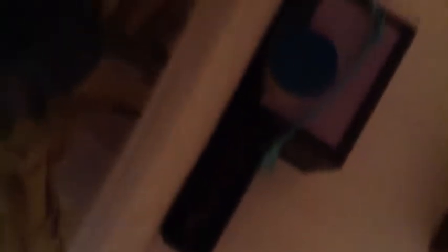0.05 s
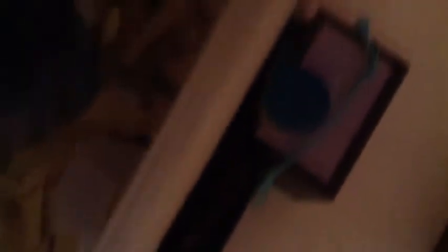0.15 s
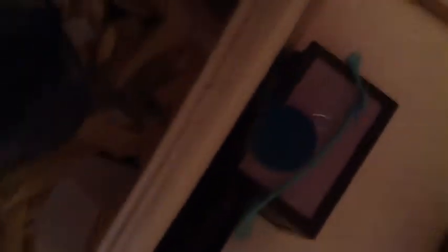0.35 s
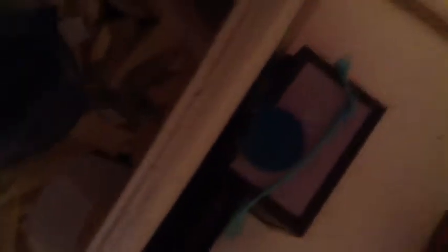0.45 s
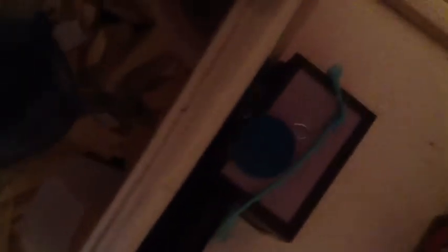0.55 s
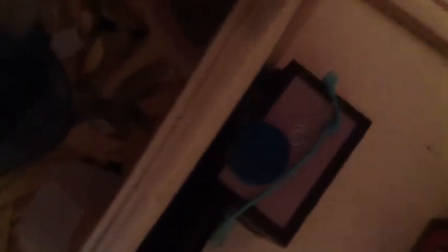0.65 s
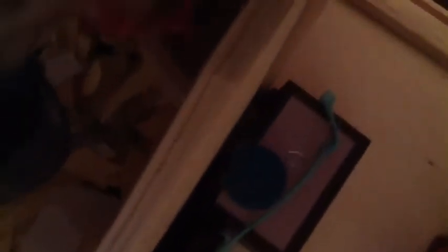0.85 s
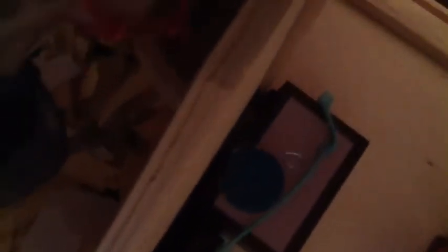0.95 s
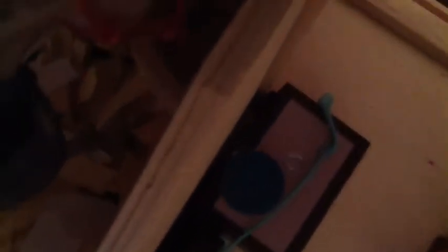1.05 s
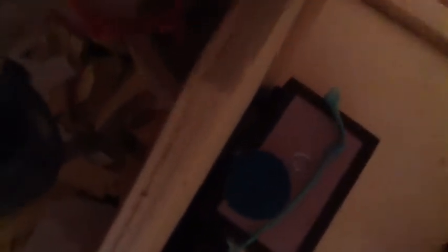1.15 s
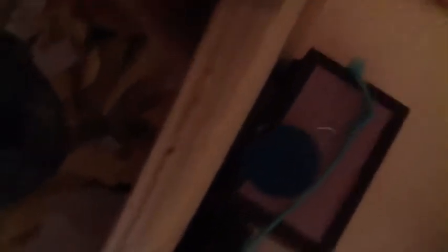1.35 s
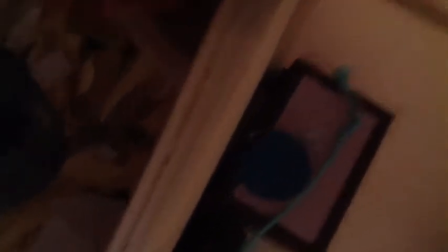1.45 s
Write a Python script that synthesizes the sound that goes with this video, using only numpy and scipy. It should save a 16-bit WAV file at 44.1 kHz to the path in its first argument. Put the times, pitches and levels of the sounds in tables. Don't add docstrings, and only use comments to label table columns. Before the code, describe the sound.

Wooden box knocked once sharply, then scraped and rubbed with light taps, over soft hiss

```python
import sys
import numpy as np
from scipy import signal
from scipy.fft import rfft, irfft
from scipy.io import wavfile
from scipy.ndimage import uniform_filter1d

SR = 44100
rng = np.random.default_rng(int(sys.argv[2]) if len(sys.argv) > 2 else 0)


def gain_from_db(level_db):
    decades = np.asarray(level_db, float) / 20
    return 10 ** decades


def unload_wav(signal):
    wavfile.write(
        sys.argv[1],
        SR,
        np.round(np.clip(np.atleast_2d(signal).T, -1, 1) * 32767).astype(np.int16),
    )


N = 66150
clock = np.arange(N) / SR

# frequency in Hz, spectral level in dB.
HISS_SPECTRUM = [(30, -19), (80, -22), (170, -1.5), (300, -2.5), (600, -8), (1500, -10.5), (5000, -10.5),
                 (15300, -13)]
# frequency in Hz, level when knocked in dB, t60 in seconds,
# level when rubbed in dB.
BOX_MODES = [(142.1, -14, 0.21, -21.5), (176, -16, 0.18, -31), (231, -24, 0.18, -31.5), (292, -4, .07, -3),
             (338.1, -14, 0.23, -14.5), (409, -13, .12, -9.5), (461.2, -19.5, .14, -5.5),
             (282.7, -8.5, .2, -10), (707.2, -7.5, .14, -2), (748.4, -14, .13, -3.5), (803, -18, 0.14, 1),
             (862, -8.5, 0.061, 7.5), (896, -21.5, .09, -13), (1073, -18, 0.088, -6)]
PANEL_MODES = [(1296, -20.5, 0.067, -4.5), (1480, -27.5, 0.023, 1), (1604, -13.5, 0.024, -2.5),
               (1910, -15.5, 0.021, -0.5), (2122, -28, 0.025, -7), (2330, -32.5, 0.026, -8.5),
               (2640, -27, .012, -13), (3060, -25.5, 0.008, -5), (3480, -30.5, .01, -14.5),
               (4094, -46.5, 0.0086, -6.5), (5120, -47.5, 0.0094, -7.5)]
# start in seconds, force in dB, half contact time in ms, crack in dB.
KNOCKS = [
    (0.2178, -25.5, 0.18, -16.5),
    (0.2195, -5, 0.53, -35.5),
    (0.2229, -29, 0.25, -15.5),
    (.25, -31.5, 0.17, -30.5),
    (0.36, -36.5, 0.86, -37),
    (0.961, -49, 0.61, -17.5),
    (1.02, -54, 0.43, -17),
    (1.121, -55, 0.51, -17),
    (1.2135, -44, 0.31, -34),
]
# frequency in Hz, level in dB, t60 in seconds.
LID_MODES = [(135, -17.5, 0.093), (175, 2, 0.02), (250, -12.5, .07), (377, -25.5, 0.1), (550, -11.5, 0.028),
             (567, -3, 0.027), (754, 0.5, 0.032), (1050, -4.5, 0.012), (1340, -15.5, 0.069),
             (2030, -26.5, .014)]
# start in seconds, force in dB, half contact time in ms.
LID_THUDS = [
    (0.3613, -39, 0.84),
    (0.8528, -26, 0.42),
    (.8559, -26, 0.5),
    (0.858, -27, 0.83),
    (.866, -34, 0.52),
    (0.877, -33.5, 0.51),
    (0.88, -44.5, 1.4),
    (0.904, -45, 2.2),
    (.922, -53, 2.4),
]
# time in seconds, pressure in dB, roughness in dB, weight in dB.
STROKES = [
    [(.359, -52, 4.5, 2), (.39, -51.5, -1.5, 9.5), (.44, -51, -0.5, 7), (.47, -49.5, -2.5, -1),
     (.495, -56, -1, 16.5), (.53, -90, 2, 9)],
    [(.535, -59.5, -8, 2), (.565, -51.5, -0.5, 2.5), (.62, -48.5, 3.5, -8), (.67, -51, 4, 2),
     (.721, -57, 8.5, 12), (.745, -80, 18, -18)],
    [(.756, -58, -5, 6), (.79, -60.5, 17.5, -22), (.84, -57, 15, 1), (.87, -64.5, 15, -5),
     (.91, -67, 11.5, -4), (.955, -69.5, 18, 6)],
    [(.957, -52, -2, 0), (.973, -56, 12.5, 2), (1.0, -72, 2, 16), (1.014, -71, 26, 3)],
    [(1.017, -58.5, 11, 11), (1.053, -50, 3, 3), (1.08, -59, 15, 14), (1.121, -49.5, 7, -5),
     (1.17, -63.5, 11.5, 13), (1.2, -71.5, 17, -4), (1.222, -55, 11.5, 10), (1.245, -73, 9, 7)],
]
# start in seconds, force in dB, half contact time in ms.
PUSHES = [
    (.792, -36, 1),
    (0.831, -58, 1),
    (1.104, -41, 0.89),
    (1.117, -41, 1),
    (1.135, -44.5, 1.0),
    (1.153, -49, 1.0),
    (1.2164, -33, 0.44),
    (1.2213, -36.5, 0.15),
]
# frequency in Hz, level in dB, t60 in seconds.
WALL_MODES = [(145, -20, 0.29), (284, -1.5, 0.17), (472, -20.5, 0.07), (580, -25, 0.067), (298, -20, 0.17),
              (222, -26, 0.13), (440, -30, 0.16), (734, -23, 0.048), (834, -0.5, 0.019),
              (1053, -11.5, 0.03)]
# start in seconds, force in dB, lean to upper modes in dB.
SLIPS = [(.384, -40.5, 3.5), (.402, -43.5, 0), (.430, -45.5, -15), (.452, -45.5, 4), (.463, -41, 10.5),
         (.485, -45.5, -16), (.550, -51, 9), (.568, -46, 14), (.588, -51, -9), (.602, -43, 13.5),
         (.618, -42, 2), (.630, -39, -3), (.641, -46.5, -5), (.650, -42.5, 3), (.657, -46, 0),
         (.672, -51.5, -20), (.695, -46.5, 3), (.703, -46.5, -9), (.72, -50, -13), (.393, -44.5, 4),
         (.44, -49, -2), (.61, -54, -7), (.759, -49, 18.5), (.79, -52, 16)]
# frequency in Hz, level in dB, t60 in seconds.
SLIP_LOW_MODES = [(292, -13.5, 0.074), (459, -10, 0.061), (727, -4, 0.083)]
# frequency in Hz, level in dB, t60 in seconds.
SLIP_HIGH_MODES = [(861, -1.5, 0.068), (1084, -19.5, 0.063), (1295, -14, 0.045), (1940, -15.5, 0.029)]
# frequency in Hz, width in Hz, level in dB.
LATCH_TONES = [(834, 29, -12.5), (1277, 125, 2), (2073, 140, -3.5), (2937, 78, -6.5), (3750, 260, -17),
               (4060, 470, -4.5), (4420, 170, -9), (4890, 320, -3), (5370, 260, -13), (7860, 300, -12.5),
               (11100, 520, -10), (12400, 610, -11), (14260, 570, -14)]
# time in seconds, level in dB, fizz in dB.
LATCH_DRAG = [(.7555, -72, -8), (.757, -42, -7), (.762, -41, -3.5), (.771, -50, -2), (.779, -48.5, -11.5),
              (.83, -50.5, -21.5), (.885, -55.5, -16), (.91, -58.5, -30), (1.0, -60, -9)]
# time in seconds, level in dB.
SNAP = [(.7565, -58), (.7595, -39.5), (.765, -43.5), (.772, -54), (.777, -76)]
# frequency in Hz, width in Hz, level in dB.
SNAP_TONES = [(3420, 200, -7), (4880, 90, -1.5), (5273, 180, -1), (7100, 500, -11), (9960, 230, -5)]
# time in seconds, level in dB.
SPRING = [(.778, -63), (.79, -61), (.83, -59), (.86, -62.5), (.89, -71), (.94, -75)]
# time in seconds, level in dB.
WHINE = [(.87, -76), (.885, -72), (.91, -72), (.96, -79), (.98, -85)]
# time in seconds, level in dB.
SQUEAK = [(.244, -73), (.252, -60.5), (.266, -70)]
# time in seconds, level in dB.
BRUSH = [(1.355, -66), (1.375, -64.5), (1.386, -54), (1.42, -59.5), (1.45, -64.5), (1.5, -77)]
# frequency in Hz, width in Hz, level in dB.
BRUSH_TONES = [(909, 240, -5.5), (1500, 430, -0.5), (1904, 530, 0), (3080, 1700, 9), (4730, 650, 7.5),
               (6360, 990, 4.5), (10200, 2500, -10), (13500, 1800, -5)]

HISS_DB = -64.5
ROOM_DB, ROOM_T60_S = -24.5, 0.26
GRIT_PER_S, GRIT_SPREAD_DB = 4000, 2.5
SLIP_MS, CRACK_S = 0.23, 0.0079
SETTLE_S, SETTLE_DB, RELEASE_S = 0.2335, -3, 0.355
BAFFLE_HZ = 146
LOW_CUT_HZ, RUB_CUT_HZ, EDGE_HZ = 118, 220, 15300


def evened(x):
    return x / np.sqrt(np.mean(x ** 2) + 1e-20)


def through(x, answer):
    return signal.fftconvolve(x, answer)[:N]


def high_pass(x, order, hz):
    return signal.sosfilt(signal.butter(order, hz, "high", fs=SR, output="sos"), x)


def ring(modes):
    t = clock[clock < 0.33]
    return sum(gain_from_db(db - 60 * t / max(t60, 0.002)) * np.sin(2 * np.pi * hz * t)
               for hz, db, t60, *_ in modes)


def bands(tones):
    return ring([(hz, db + 10 * np.log10(width), 3.6 / width) for hz, width, db in tones])


def blow(s, db, contact_ms):
    u = (clock - s) / (max(contact_ms, 0.04) / 1000)
    bump = np.where((u > 0) & (u < 2), np.sin(np.pi * u / 2) ** 2, 0)
    return gain_from_db(db) * bump / bump.sum()


def grit(per_s, spread_db):
    happens = rng.random(N) < per_s / SR
    size = gain_from_db(spread_db * np.minimum(rng.exponential(1, N), 4))
    return evened(happens * rng.standard_normal(N) * size)


def follow(rows, order):
    rows = np.array(rows)
    gain = gain_from_db(np.interp(clock, rows[:, 0], rows[:, order]))
    return gain * (clock >= rows[0, 0]) * (clock < rows[-1, 0])


def scrape(curve, tones, fizz):
    answer = bands(tones)
    drive = grit(20000, 0.76) * follow(curve, order=1)
    return through(drive, answer / np.linalg.norm(answer)) + fizz * np.diff(drive, prepend=0)


def hiss():
    hz = np.fft.rfftfreq(N, 1 / SR)
    f, db = np.transpose(HISS_SPECTRUM)
    shape = gain_from_db(np.interp(np.log(hz + 1), np.log(f + 1), db))
    return gain_from_db(HISS_DB) * evened(irfft(rfft(rng.standard_normal(N)) * shape, N))


def stall(x):
    t = clock[clock < 0.3]
    noise = signal.lfilter([1], [1, -0.8], rng.standard_normal(len(t)))
    tail = noise * gain_from_db(-60 * t / ROOM_T60_S) * (t > 0.006)
    return gain_from_db(ROOM_DB) * through(x, tail / np.linalg.norm(tail))


def brush():
    return scrape(BRUSH, BRUSH_TONES, gain_from_db(-6.0))


def squeak():
    return scrape(SQUEAK, [(4700, 500, 0)], 0)


def latch():
    spring = scrape(SPRING, [(10500, 180, 0)], 0)
    whine = scrape(WHINE, [(7950, 120, 0)], 0)
    drag = scrape(LATCH_DRAG, LATCH_TONES, follow(LATCH_DRAG, order=2))
    return drag + scrape(SNAP, SNAP_TONES, 0) + spring + whine


def lid():
    return through(sum(blow(*row) for row in LID_THUDS), ring(LID_MODES))


def pushes():
    return -through(sum(blow(*row) for row in PUSHES), ring(WALL_MODES))


def slips():
    lower = sum(blow(s, db - lean_db / 2, SLIP_MS) for s, db, lean_db in SLIPS)
    upper = sum(blow(s, db + lean_db / 2, SLIP_MS) for s, db, lean_db in SLIPS)
    return through(lower, ring(SLIP_LOW_MODES)) + through(upper, ring(SLIP_HIGH_MODES))


def rubbing():
    modes = [(hz, db, t60) for hz, _, t60, db in BOX_MODES + PANEL_MODES]
    ranges_hz = (0, 520), (520, 1000), (1000, 9000)
    low, mid, high = [ring([m for m in modes if lo < m[0] < hi]) for lo, hi in ranges_hz]
    drive = grit(GRIT_PER_S, GRIT_SPREAD_DB)
    press = sum(follow(r, order=1) for r in STROKES)
    rough = sum(follow(r, order=1) * follow(r, order=2) for r in STROKES)
    weight = sum(follow(r, order=1) * follow(r, order=3) for r in STROKES)
    fine_grit = uniform_filter1d(grit(9000, 1.0), size=2)
    rasp = gain_from_db(-10.0) * rough * signal.lfilter([0.5], [1, -0.7], fine_grit)
    body = through(drive * weight, low) + through(drive * press, mid) + through(drive * rough, high)
    return rasp + body / np.linalg.norm(mid)


def knocks():
    force = -sum(blow(s, db, ms) for s, db, ms, _ in KNOCKS)
    sharp = sum(blow(s, db + crack_db, 0.11) for s, db, _, crack_db in KNOCKS)
    panel = ring(PANEL_MODES)
    noise = signal.lfilter([0.45], [1, -0.6], rng.standard_normal(len(panel)))
    crack = noise * np.exp(-clock[:len(panel)] / CRACK_S)
    landed = np.clip((clock - SETTLE_S) / 0.003, 0, 1)
    damping = gain_from_db(SETTLE_DB * landed * (clock < RELEASE_S))
    return damping * through(force, ring(BOX_MODES)) + through(sharp, crack + gain_from_db(26.5) * panel)


def scene():
    rub = high_pass(rubbing() + slips() + pushes(), 2, RUB_CUT_HZ)
    box = high_pass(knocks(), 2, BAFFLE_HZ)
    near = box + squeak() + lid() + rub + latch() + brush()
    return (high_pass(near + stall(near), 5, LOW_CUT_HZ) + hiss())[None]


def band_limit(x):
    return signal.sosfilt(signal.butter(12, 15410, fs=SR, output="sos"), x)


def record(dry):
    edge = signal.firwin(511, EDGE_HZ, window=("kaiser", 9), fs=SR)
    mix = signal.oaconvolve(dry, edge[None], "same")
    return band_limit(mix)


dry = scene()
out = record(dry)
unload_wav(out)
```